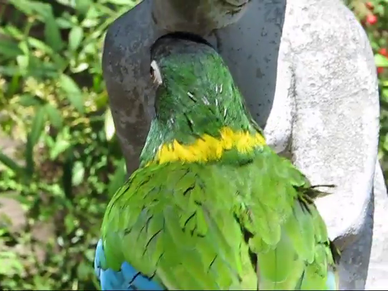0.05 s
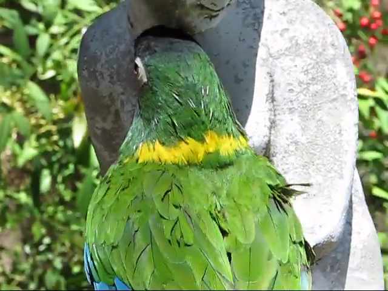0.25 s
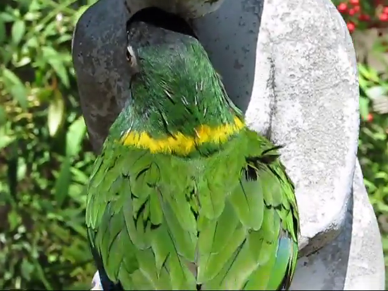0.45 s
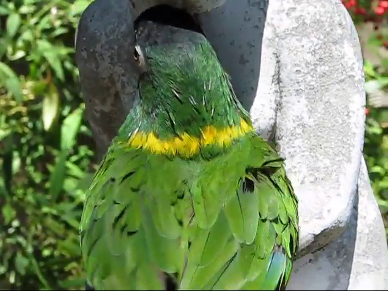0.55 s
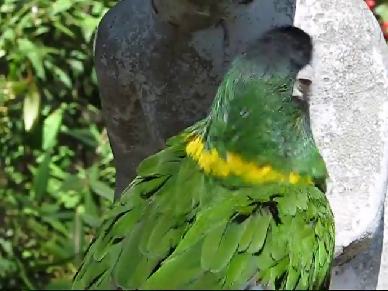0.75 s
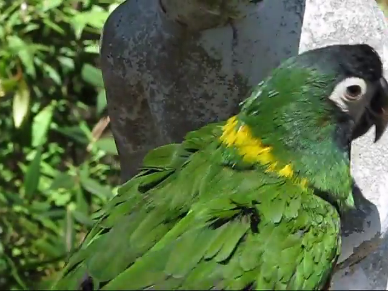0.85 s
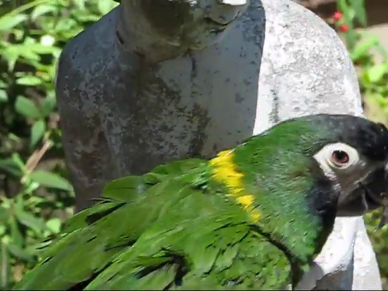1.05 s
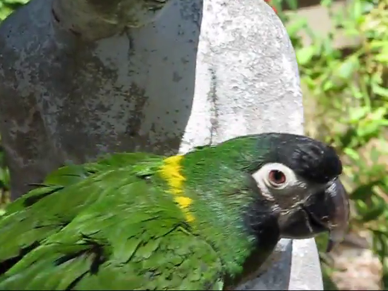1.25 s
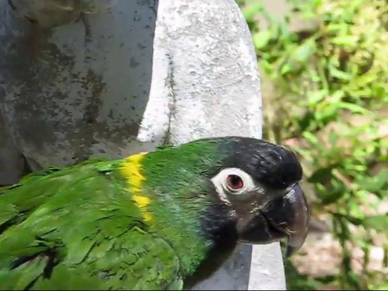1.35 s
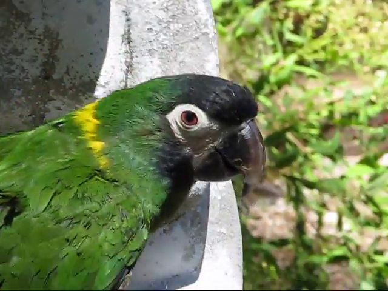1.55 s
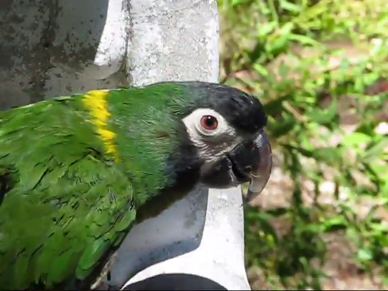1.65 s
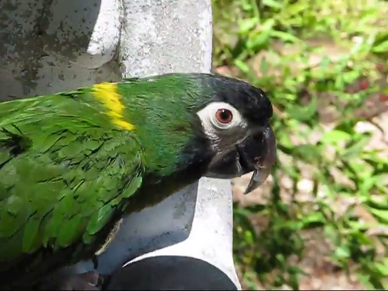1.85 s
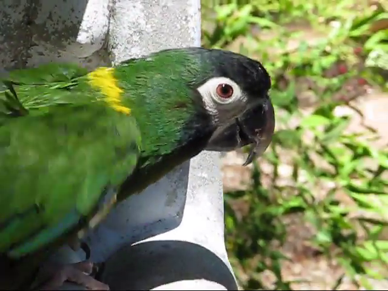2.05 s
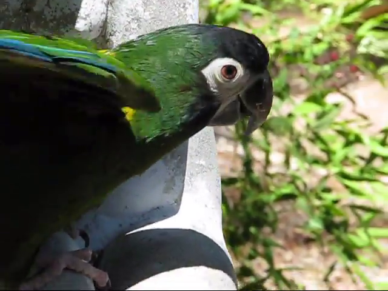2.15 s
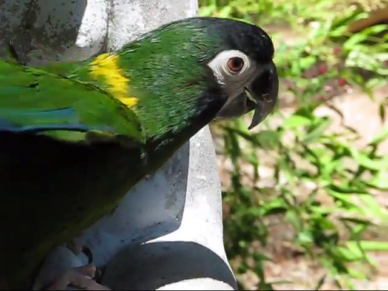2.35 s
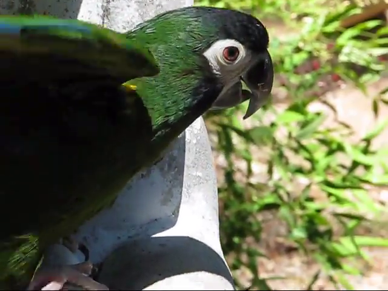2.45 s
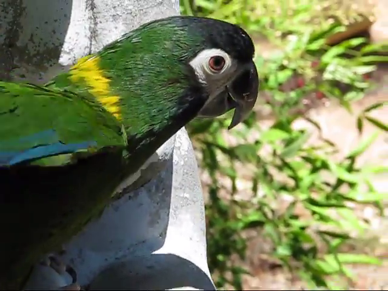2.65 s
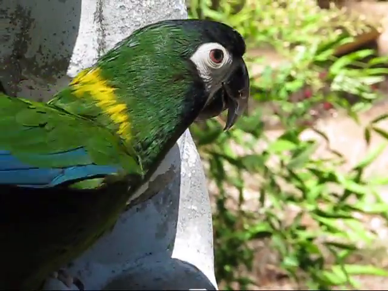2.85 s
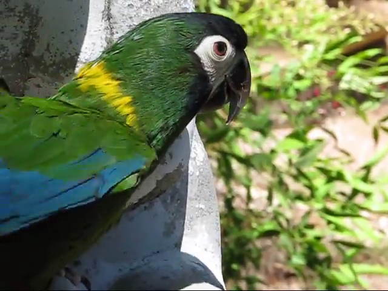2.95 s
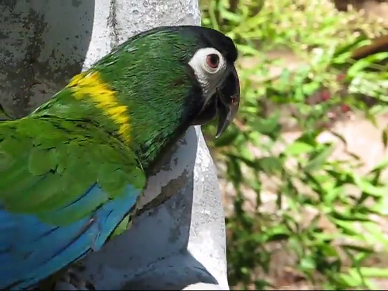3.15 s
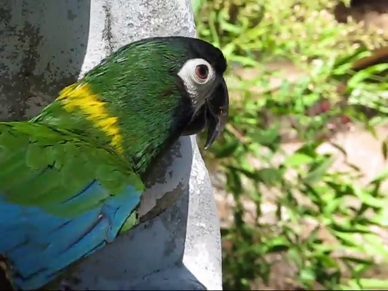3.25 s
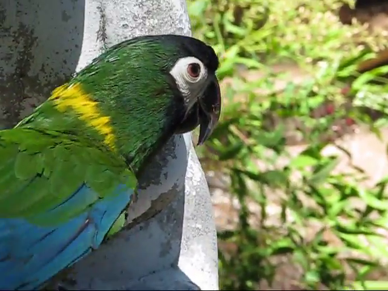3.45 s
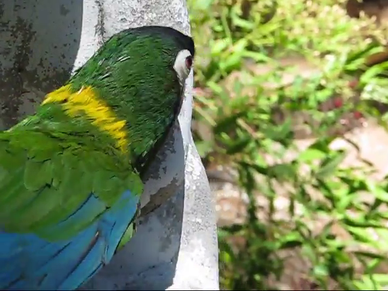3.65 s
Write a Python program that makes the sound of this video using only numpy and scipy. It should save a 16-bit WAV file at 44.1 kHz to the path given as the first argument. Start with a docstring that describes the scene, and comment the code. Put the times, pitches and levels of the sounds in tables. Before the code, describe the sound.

A garden fountain trickles throughout: soft low gurgling, fine hissing spatter and occasional bright nearby plinks, over a faint low traffic rumble. At 0.2 s a thin distant bird chirp slides downward. At about 0.7 s a macaw close to the microphone gives a short falling growl, then rapid, piercing, raspy screeches from 0.9 to 1.4 s, arching up and down in pitch. A quavering cry follows at 1.6-1.75 s. Short echoes return from stone and foliage. Quiet, low muttered syllables come at 2.4-2.65 s, and a far chirp at 2.8 s. A second growl at 3.5 s leads into more screeches from 3.65 to 4.15 s. Afterwards water remains, with a strong drop at 4.6 s and a cluster near 5 s. A distant motor's low hum climbs from 4.6 s onward, a faint whine appears around 5 s, and a last chirp at 5.5 s. Automatic gain dips on loud calls and slowly recovers.

```python
"""In a garden a faint bird chirps; then a small macaw close by growls, screeches and gives a long quavering cry.
It mutters, the far bird chirps again, and a second growl leads into more screeches, echoed by stone walls.
Near the end a distant motor gathers speed, with a faint whine and a last chirp.
Voices are swept harmonics shaped by a throat; a fountain of random bubbles and noise trickles throughout.
A gain control turns everything down when it gets loud and slowly brings it back."""
import sys
import numpy as np
from scipy import signal
from scipy.fft import rfft, irfft, next_fast_len
from scipy.io import wavfile
from scipy.ndimage import uniform_filter1d, minimum_filter1d, map_coordinates

SR = 44100
rng = np.random.default_rng(int(sys.argv[2]) if len(sys.argv) > 2 else 0)


def log_audio(samples):
    """Write samples as a 16-bit WAV file to the path given in sys.argv[1]."""
    # one column per channel
    frames = np.atleast_2d(samples).T
    # limit to full scale, then quantise
    limited = np.clip(frames, -1, 1)
    pcm = np.round(limited * 32767).astype(np.int16)
    wavfile.write(sys.argv[1], SR, pcm)


N = 250929  # length in samples
TOP_HZ = 12100  # voices have no harmonics above this, and the whole sound is cut off here

# How the macaw's throat favours some tones in a screech. Each row: frequency in Hz, relative gain in dB.
SCREECH_THROAT = [(500, -1.5), (950, -31), (1400, 5), (1950, 4.5), (2400, 9.5), (2750, 8), (3400, -1.5),
                  (4300, -1.5), (5150, -3), (5900, -9), (6700, -12.5), (7900, -17), (8900, -29.5),
                  (10400, -21.5), (11800, -48.5)]


def amp(db):
    """Turns decibels into a gain factor."""
    return 10 ** (np.asarray(db) / 20)


def unit(x):
    """Scales a sound to an average strength (rms) of 1."""
    return x / np.sqrt(np.mean(x ** 2) + 1e-20)


def along(points, hz):
    """Reads a curve of (Hz, value) points on a logarithmic frequency axis."""
    f, v = np.transpose(points)
    return np.interp(np.log(hz + 1), np.log(f + 1), v)


def curves(rows, t):
    """Reads each column after the first (time in seconds) at the times t."""
    s, *columns = np.transpose(rows)
    return [np.interp(t, s, column) for column in columns]


def wobble(rate, size):
    """A smooth random curve with rate new random values a second."""
    knots = rng.standard_normal(int(size * rate / SR) + 4)
    return map_coordinates(knots, [np.arange(size) * rate / SR])


def filtered(x, response):
    """Multiplies the spectrum of x by a gain that depends on frequency."""
    size = x.shape[-1]
    padded = next_fast_len(size + 8192)
    spectrum = rfft(x, padded) * response(np.fft.rfftfreq(padded, 1 / SR))
    return irfft(spectrum, padded)[..., :size]


def coloured(x, spectrum):
    """Shapes x with a curve of (Hz, dB) points and scales it to rms 1."""
    return unit(filtered(x, lambda hz: amp(along(spectrum, hz))))


def add(track, s, sound):
    """Mixes a sound into the track at s seconds."""
    part = track[max(round(s * SR), 0):][:len(sound)]
    part += sound[:len(part)]


def macaw():
    """Growls, screeches, a quavering cry and mutters; screeches turn harsh where the pitch falls."""
    # Screech notes. Each row: start in seconds, length in seconds, first, crest and last pitch in Hz,
    # relative level in dB, extra brightness in dB, lift above 7 kHz in dB.
    screech_notes = [(0.881, 0.081, 1403, 2681, 2220, -14, -4, 5),
                     (0.966, .040, 2243, 2540, 2094, -17, 2, -4),
                     (1.16, 0.033, 1306, 1550, 964, -15, 0.5, 4),
                     (1.19, 0.011, 1100, 1680, 1654, -13.5, 3, 3),
                     (1.202, .037, 2144, 2610, 1733, -11.5, -1.5, -1),
                     (1.241, 0.02, 1574, 1592, 900, -20, -4, 8),
                     (1.257, 0.013, 1000, 1717, 1674, -13, 4.5, 4),
                     (1.27, 0.059, 2070, 2612, 2156, -15, 1.5, -5),
                     (1.331, 0.031, 2348, 2457, 1864, -22.5, -4.5, -19),
                     (3.660, 0.09, 1724, 2730, 2110, -13.5, 0, -2.5),
                     (3.75, 0.04, 2106, 2558, 2050, -14.5, 2.5, -7),
                     (3.955, .027, 1253, 1529, 864, -15.5, 1, 2.5),
                     (3.984, .010, 1115, 1705, 1693, -10.5, 9, -2),
                     (3.996, 0.036, 1802, 2638, 1537, -12, 2, 1),
                     (4.033, 0.016, 1504, 1547, 828, -20.5, 0, -2),
                     (4.049, 0.01, 1100, 1710, 1700, -15, 3, 1),
                     (4.059, 0.053, 2067, 2560, 2030, -16, 0.5, -3),
                     (4.115, 0.026, 1825, 1887, 1546, -25.5, -12, -13)]
    # The long quavering cry. Each row: time in seconds, pitch in Hz, relative level in dB, brightness in dB.
    cry_curve = [(1.565, 2010, -27, 1), (1.607, 2464, -14.5, -3), (1.653, 2546, -16, -3.5),
                 (1.69, 2454, -18.5, -5), (1.735, 2185, -27, 3), (1.765, 2060, -34, -1)]
    # Growls. Each row: start in seconds, length in seconds, first pitch in Hz, time to settle in seconds,
    # resting pitch in Hz, relative level in dB.
    growl_notes = [(0.734, 0.12, 1686, .066, 660.3, -17.5), (3.485, 0.14, 2152, .118, 651.4, -16)]
    # Muttered syllables. Each row: start in seconds, length in seconds, first and last pitch in Hz,
    # relative level in dB.
    mutter_notes = [(2.417, .025, 357.5, 378, -35.5), (2.463, 0.076, 380, 343.3, -35),
                    (2.561, .035, 417.5, 364, -38.5), (2.604, 0.0495, 325, 380.5, -32)]
    # The throat when growling and muttering. Each row: frequency in Hz, relative gain in dB.
    growl_throat = [(400, -13), (680, -4), (1000, -0.5), (1450, 5.5), (2000, 3), (3200, -10.5), (4000, -7),
                    (4800, -12.5), (5400, -7.5), (6500, -29.5), (11000, -27)]
    mutter_throat = [(350, -7), (720, 1.5), (1080, 2), (1450, -10), (2000, 0), (2900, -14), (3800, -10),
                     (6000, -27)]

    screeches = sum(arch(*row) for row in screech_notes)
    hoarse = lambda pitch: np.interp(pitch, [2150, 2500], [.5, .08])  # rougher when lower
    cry = call(cry_curve, SCREECH_THROAT, jitter=.012, flutter_db=2.5, rasp=hoarse,
               trill=.06, trill_hz=66, crest_s=1.653)
    growls = sum(call(growl(*row), growl_throat, jitter=.014, flutter_db=4, rasp=lambda pitch: .2)
                 for row in growl_notes)
    syllables = [glide(*row, bright_db=-12, attack_s=0.011, release_s=0.011) for row in mutter_notes]
    mutter = sum(call(rows, mutter_throat, jitter=.014, flutter_db=3, rasp=lambda pitch: .26)
                 for rows in syllables)
    return amp(4.0) * screeches + amp(5.5) * cry + amp(-2.0) * growls + amp(3) * mutter


def arch(s, length, first_hz, crest_hz, last_hz, db, extra_db, lift_db):
    """A screech note swings up to its crest and down again; level, timbre and rasp follow the pitch."""
    # Timbre by pitch. Each row: pitch in Hz, brightness in dB (power above about 3.5 kHz against below).
    brightness_by_pitch = [(850, 5), (1270, -10.5), (1600, 6.5), (2150, 4), (2500, -7.5), (2700, -8)]
    # Harshness by pitch. Each row: pitch in Hz, roughness from 0 to 1.
    rasp_by_pitch = [(1400, .18), (2000, .21), (2400, .1), (2650, .03)]
    t = np.arange(0, length, 1 / SR)
    power = 1.3 + 18 * length  # the longer the note, the flatter its crest
    rise, fall = np.abs([crest_hz - first_hz, crest_hz - last_hz]) ** (1 / power)
    pitch = crest_hz - np.abs((rise + fall) * t / length - rise) ** power
    # the voice weakens by 6 dB per octave away from the crest
    level = db + 6 * np.log2(pitch / crest_hz)
    level = level + envelope(t, attack_s=0.0097, release_s=0.0063, depth_db=3.5)
    brightness = along(brightness_by_pitch, pitch) + extra_db
    rows = np.transpose([s + t, pitch, level, brightness])
    throat = [(hz, gain + lift_db * (hz > 7000)) for hz, gain in SCREECH_THROAT]
    return call(rows, throat, jitter=0.0056, flutter_db=5.0, rasp=lambda pitch: along(rasp_by_pitch, pitch))


def growl(s, length, first_hz, settle_s, rest_hz, db, swell_db=8.0, first_bright_db=1, last_bright_db=-12):
    """A growl drops to its resting pitch, swelling and growing duller on the way."""
    break_s, slide_hz, slide_power = 0.013, 520.4, 1.1
    t = np.arange(0, length, 1 / SR)
    # the voice breaks down quickly, then slides the rest of the way
    slide = np.clip(1 - t / settle_s, 0, 1) ** slide_power
    quick_fall = (first_hz - rest_hz - slide_hz) * np.exp(-t / break_s)
    pitch = rest_hz + slide_hz * slide + quick_fall
    level = db - swell_db * slide + envelope(t, attack_s=0.0027, release_s=0.032, depth_db=3)
    brightness = np.interp(t, [0, length], [first_bright_db, last_bright_db])
    return np.transpose([s + t, pitch, level, brightness])


def glide(s, length, first_hz, last_hz, db, bright_db, attack_s, release_s, curve=1):
    """A soft note that slides from one pitch to another."""
    t = np.arange(0, length, 1 / SR)
    pitch = first_hz * (last_hz / first_hz) ** ((t / length) ** curve)
    level = db + envelope(t, attack_s, release_s, depth_db=2.5)
    return np.transpose([s + t, pitch, level, np.full_like(t, bright_db)])


def envelope(t, attack_s, release_s, depth_db):
    """Level in dB of a note that rises from depth_db down, holds and falls back."""
    start_dip = np.clip(1 - t / attack_s, 0, 1)
    end_dip = np.clip(1 - (t[-1] - t) / release_s, 0, 1)
    return -depth_db * (start_dip + end_dip)


def call(rows, throat, jitter, flutter_db, rasp, trill=0, trill_hz=0, crest_s=0):
    """The bird's voice organ sweeps its harmonics through the fixed resonances of the throat."""
    t = np.arange(rows[0][0] - .004, rows[-1][0] + .004, 1 / SR)
    size = len(t)
    pitch, level_db, bright_db = uniform_filter1d(np.array(curves(rows, t)), size=130, axis=1)
    rough = rasp(pitch)
    pitch = pitch * (1 + trill * np.cos(2 * np.pi * trill_hz * (t - crest_s)))
    phase = 2 * np.pi * np.cumsum(pitch * (1 + jitter * wobble(904, size))) / SR
    # in a rough voice strong and weak cycles alternate, which adds lines halfway between the harmonics
    order = np.arange(1, 29)[:, None] / 2
    hz = order * pitch
    gains = amp(along(throat, hz)) * (hz < TOP_HZ) * np.where(order % 1, .8 * rough, 1)
    # a harder push shifts the power to the upper harmonics, by at most 12 dB either way
    upper = np.clip((hz - 3200) / 600, 0, 1)
    upper_power = ((gains * upper) ** 2).sum(0)
    lower_power = ((gains * (1 - upper)) ** 2).sum(0).clip(1e-6)
    present_db = 10 * np.log10(upper_power / lower_power + 1e-9)
    gains = gains * amp(upper * np.clip(bright_db - present_db, -12, 12))
    # each line flutters on its own, and its phase drifts the more the rougher the voice
    gains = gains * amp(flutter_db * np.array([wobble(302.7, size) for _ in order]))
    start_phase = rng.uniform(0, 2 * np.pi, order.shape)
    lag = start_phase + 1.3 * rough * np.array([wobble(400, size) for _ in order])
    lines = gains * np.sin(order * phase + lag)
    tone = np.sqrt(2) * lines.sum(0) / np.linalg.norm(gains, axis=0)
    # air escapes in one puff a cycle
    air = coloured(rng.standard_normal(size) * (1 + np.cos(phase)), throat)
    fade = np.clip(np.minimum(t - t[0], t[-1] - t) / .004, 0, 1)
    loudness = amp(level_db + 0.4 * wobble(300.5, size))
    track = np.zeros(N)
    add(track, t[0], fade * loudness * (tone + rough * air))
    return track


def far_bird():
    """Thin whistles that slide down by most of an octave, and one faint, nearly level whine."""
    # Chirps. Each row: start in seconds, length in seconds, first pitch in Hz, relative level in dB.
    chirp_notes = [(0.215, 0.065, 3217, -30), (2.802, .085, 3540, -28.5), (5.494, 0.071, 3133, -27)]
    # The whine. Each row: time in seconds, pitch in Hz, relative level in dB, brightness in dB.
    whine_curve = [(4.96, 1534, -41.5, 7.1), (5.03, 1525, -46, 14), (5.1, 1525, -46, 10)]
    # The throat for chirps and for the whine. Each row: frequency in Hz, relative gain in dB.
    chirp_throat = [(1600, 4), (2700, 6), (4500, -2.5), (6000, -25), (8500, -3.5), (11000, -27)]
    whine_throat = [(1500, -18), (3000, -9), (4500, 4), (7600, 0), (9000, -6)]
    # every chirp slides down to 1780 Hz, slightly faster at first
    notes = [glide(s, length, hz, 1780, db, bright_db=-9.0, attack_s=0.012, release_s=0.024, curve=0.97)
             for s, length, hz, db in chirp_notes]
    chirps = sum(call(rows, chirp_throat, jitter=0.012, flutter_db=5.5, rasp=lambda pitch: .12)
                 for rows in notes)
    whine = call(whine_curve, whine_throat, jitter=.004, flutter_db=2, rasp=lambda pitch: .05)
    return amp(-1.0) * chirps + amp(4.0) * whine


def drops():
    """A near drop slaps the water and leaves a tiny ringing bubble that rises in pitch."""
    # The nearest drops. Each row: time in seconds, relative peak level in dB, starting pitch in Hz.
    drop_list = [(0.0548, -13, 3540), (0.3915, -15, 3720), (1.513, -11, 5290), (2.1291, -20, 4960),
                 (2.6673, -13.5, 2660), (3.2465, -17, 5700), (3.3942, -14.5, 5200), (3.467, -16, 4360),
                 (4.582, -5.5, 3660), (4.6892, -15, 4400), (4.8938, -13, 5340), (4.9721, -13, 4400),
                 (4.9916, -9.5, 5560), (5.0135, -11.5, 3760), (5.3148, -16, 3936), (5.437, -10, 3650)]
    slap_spectrum = [(1000, -17), (4500, 16.0), (9000, -0.5), (12000, -21.0)]  # (Hz, dB)
    track = np.zeros(N)
    t = np.arange(SR // 25) / SR
    for s, db, hz in drop_list:
        ring = np.sin(2 * np.pi * hz * t * (1 + 4 * t))
        bubble = ring * amp(-60 * t / 0.012) * (1 - np.exp(-t / 0.00024))
        # the slap is a brief burst of noise
        slap = coloured(rng.standard_normal(len(t)), slap_spectrum) * amp(-60 * t / 0.025)
        add(track, s, amp(db - 1.5) * (bubble + 0.26 * slap))
    return track


def fountain():
    """Falling water gurgles in the basin and spatters on its surface, over a fine spray."""
    # The water's level over time. Each row: time in seconds, relative gurgle and splash levels in dB.
    flow_curve = [(0, -38.5, -34.5), (.6, -36.5, -35), (1.1, -36, -32), (1.45, -39.5, -32.5),
                  (1.9, -37.5, -35), (2.3, -39, -33.5), (2.75, -39.5, -34.5), (3.1, -39.5, -34.5),
                  (3.42, -38.5, -32), (3.88, -38, -30.5), (4.3, -39.5, -32.5), (4.65, -38, -34.5),
                  (4.85, -38, -30.5), (5.02, -37.5, -31), (5.2, -35.5, -32.5), (5.4, -36, -32.5),
                  (5.69, -39, -32)]
    # Tone colours of gurgle and splash. Each row: frequency in Hz, relative gain in dB.
    gurgle_spectrum = [(130, -28), (220, -4.5), (397, -18.5), (476, 0.5), (526, -4), (680, 0), (752, -5),
                       (887, -3.5), (1600, -19), (2080, -33), (3520, -120)]
    splash_spectrum = [(710, -20), (1200, 2), (1990, 0.5), (2200, -2.5), (2860, -3.5), (3650, -3.5),
                       (4840, -3), (5490, -5), (10700, -12.5), (11700, -17), (12300, -99), (16000, -64),
                       (22000, -120)]
    gurgle_db, splash_db = curves(flow_curve, np.arange(N) / SR)
    gurgle = bubbles(rate=240, low_hz=393.3, high_hz=1132, cycles=8.6, scatter_db=5.0, size=2600)
    gurgle = gurgle + 3.1 * rng.standard_normal(N)
    spatter = bubbles(rate=900, low_hz=2230, high_hz=11770, cycles=4.2, scatter_db=5.0, size=300)
    spray = unit(rng.standard_normal(N) * amp(3.44 * wobble(260, N)))
    basin = amp(gurgle_db + 0.8) * coloured(gurgle, gurgle_spectrum)
    surface = amp(splash_db - 1.15) * coloured(spatter + 1.25 * spray, splash_spectrum)
    return basin + surface


def bubbles(rate, low_hz, high_hz, cycles, scatter_db, size):
    """Bubbles born at random, rate a second; each rings for some cycles and rises in pitch."""
    count = int(rate * N / SR)
    when, tune, strength = rng.random((count, 3)).T[:, :, None]
    hz = low_hz * (high_hz / low_hz) ** tune
    t = np.arange(size) / SR
    age = t * hz / cycles
    gain = hz * amp(scatter_db * np.minimum(-np.log(strength), 4))
    ring = np.sin(2 * np.pi * hz * t * (1 + .012 * np.minimum(age, 5)))
    rings = gain * ring * np.exp(-age) * (1 - np.exp(-8 * age))
    index = (when * N).astype(int) + np.arange(size)
    return unit(np.bincount(index.ravel(), rings.ravel(), N)[:N])


def traffic():
    """A steady low rumble of noise from afar, and one motor of two harmonics that gathers speed."""
    # The motor. Each row: time in seconds, firing rate in Hz, relative level in dB.
    motor_curve = [(4.6, 51.1, -48), (4.82, 60, -33.5), (4.97, 70.6, -35), (5.1, 72.8, -28),
                   (5.17, 82.6, -36), (5.27, 83.5, -32.5), (5.45, 86.7, -32), (5.58, 89.1, -32.5),
                   (5.69, 92, -40)]
    # Tone colour of the distant traffic. Each row: frequency in Hz, relative gain in dB.
    rumble_spectrum = [(11, -29), (18, -18), (38, 4), (71, -5.5), (101, 2.5), (135, -6), (227, -10.5),
                       (263, -12), (350, -11.5), (460, -18), (770, -120)]
    t = np.arange(N) / SR
    firing_hz, motor_db = curves(motor_curve, t)
    phase = 2 * np.pi * np.cumsum(firing_hz) / SR
    fade_in = np.clip((t - motor_curve[0][0]) / 0.11, 0, 1)
    motor = np.sqrt(2) * (np.sin(phase) + amp(-17.5) * np.sin(2 * phase)) * fade_in
    rumble = amp(-39.5) * coloured(rng.standard_normal(N), rumble_spectrum)
    return rumble + amp(motor_db + 1.0 + 1.1 * wobble(23.32, N)) * motor


def garden(x, early_db, tail_db):
    """Near stone surfaces answer at once; walls and foliage scatter a short tail."""
    # How long echoes last. Each row: frequency in Hz, time in seconds to fade by 60 dB.
    fade_times = [(300, 0.12), (1700, 0.63), (2500, 0.45), (3400, 0.52), (5000, 0.36), (11000, 0.052)]
    # the tail is noise that fades at its own speed in each band
    hz, t, z = signal.stft(rng.standard_normal((2, SR // 2)), SR, nperseg=256)
    decay = amp(-60 * t / along(fade_times, hz)[:, None])
    tail = signal.istft(z * decay, SR, nperseg=256)[1]
    echo = amp(tail_db) * tail / np.linalg.norm(tail[0])
    count = 14  # early echoes
    delay = rng.uniform(0.002012, .04, count)  # seconds
    taps = rng.standard_normal((2, count)) * np.exp(-delay / 0.031)
    taps = taps / np.linalg.norm(taps, axis=1, keepdims=True)
    echo[:, (delay * SR).astype(int)] += amp(early_db) * taps
    return signal.fftconvolve(x[None], echo, axes=1)[:, :N]


def gain_control(x):
    """Loud sound pulls the gain down at once; it is held for a moment, then creeps back."""
    threshold_db, share, hold_s, recover_db_per_s = -16, 0.55, 0.3, 4.5
    power = uniform_filter1d(np.mean(x ** 2, axis=0), size=SR // 40)
    level_db = 10 * np.log10(np.abs(power) + 1e-12)
    # a share of the excess over the threshold is taken off
    wanted_db = -share * np.maximum(level_db - threshold_db, 0)
    half = int(hold_s * SR / 2)
    held_db = minimum_filter1d(wanted_db, 2 * half + 1, origin=half, mode="nearest")
    # the gain may rise no faster than this ramp
    ramp_db = recover_db_per_s * np.arange(N) / SR
    gain_db = np.minimum.accumulate(held_db - ramp_db) + ramp_db
    return x * amp(uniform_filter1d(gain_db, size=SR // 100))


def scene():
    """Everything lies near the centre; the echoes spread widest around 2.5 to 3.3 kHz."""
    # How far the water spreads between the ears. Each row: frequency in Hz, side level in dB.
    water_width = [(60, -54), (110, -39), (190, -33), (350, -30), (630, -29), (1130, -16.5), (2040, -7.5),
                   (3670, -3), (6600, -43), (11900, -21)]
    near, far, drips, water = macaw(), far_bird(), drops(), fountain()
    # the far bird sends a larger share into the echo than the macaw, the drops a smaller one
    echo_mid, echo_side = garden(near + amp(-6) * drips + amp(1) * far, early_db=-6.5, tail_db=-11.5)
    mid = near + far + drips + water + traffic() + echo_mid
    width = [(300, -68), (1300, -12.5), (2500, -4), (3300, 9), (4500, -39.5), (11000, -80)]  # (Hz, side dB)
    lean = [(1200, -45), (2600, -13.5), (4000, -69)]  # the macaw sits a little to the right: (Hz, side dB)
    side = filtered(echo_side, lambda hz: amp(along(width, hz)))
    side = side - filtered(near, lambda hz: amp(along(lean, hz)))
    # the water also arrives scattered from all around: a shifted copy is unlike the original
    side = side + filtered(np.roll(water, N // 2), lambda hz: amp(along(water_width, hz)))
    return np.array([mid + side, mid - side])


def record(dry):
    """The gain control rides the level, and a steep filter removes what lies above the band limit."""
    return filtered(gain_control(dry), lambda hz: 1 / np.sqrt(1 + (hz / TOP_HZ) ** 120))


dry = scene()
out = record(dry)
log_audio(out)
```